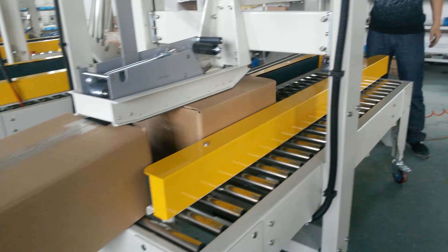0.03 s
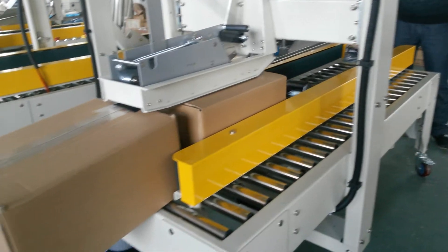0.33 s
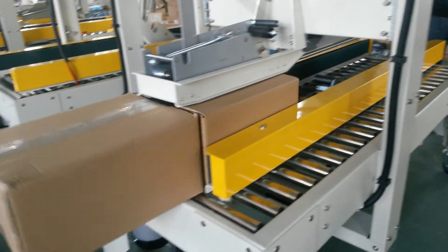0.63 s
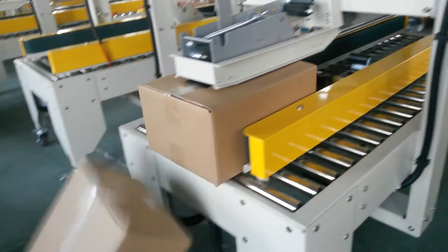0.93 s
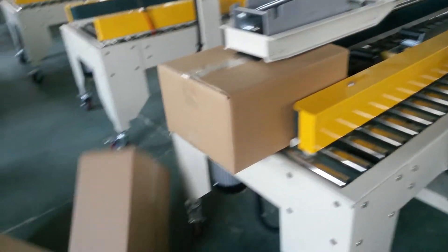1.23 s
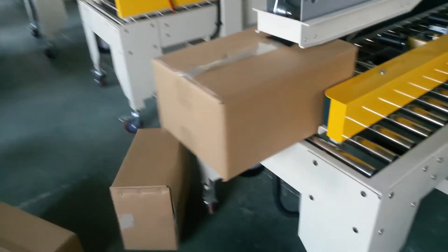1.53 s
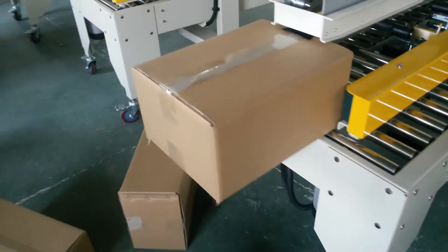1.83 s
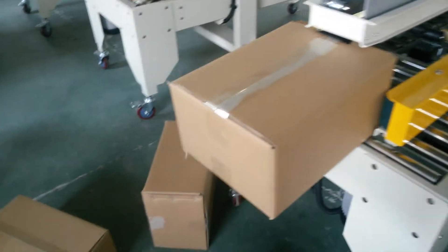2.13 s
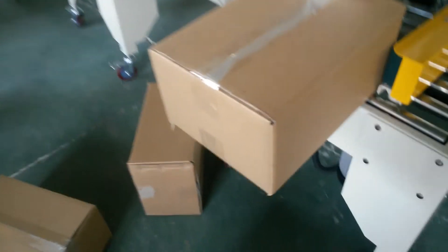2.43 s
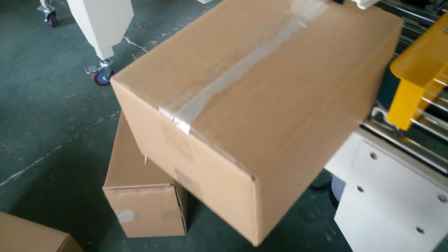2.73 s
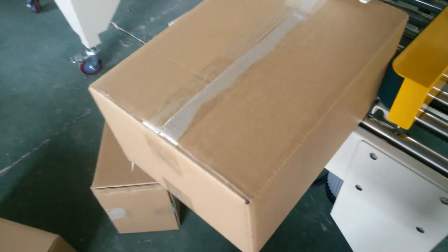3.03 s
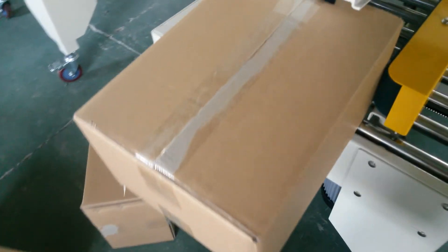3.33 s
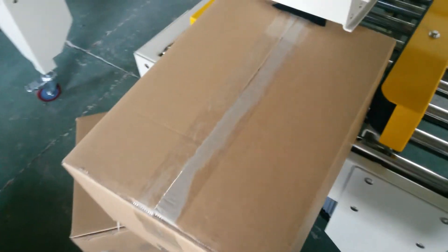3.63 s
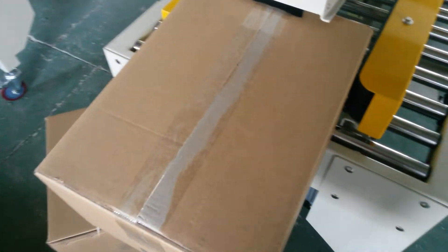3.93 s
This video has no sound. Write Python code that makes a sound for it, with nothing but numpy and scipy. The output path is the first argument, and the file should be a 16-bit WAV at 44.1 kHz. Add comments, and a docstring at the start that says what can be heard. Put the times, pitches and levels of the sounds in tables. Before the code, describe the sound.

Packing tape rasps loudly through a carton sealing machine, then hollow knocks and a motor hum.

```python
"""Carton sealer in a factory hall

Heard close to the machine, in mono. Packing tape tears off its roll in a loud, fluttering
rasp until the blade cuts it; one carton drops off the end and the tape rollers knock hollowly on the
next. The hall rings out, leaving the drive's hum and whine and the rub of the belts, and another
carton bumps into the machine."""
import sys
import numpy as np
from scipy import signal
from scipy.fft import rfft, irfft
from scipy.io import wavfile
from scipy.ndimage import uniform_filter1d

SR = 44100
rng = np.random.default_rng(int(sys.argv[2]) if len(sys.argv) > 2 else 0)


def master(y):
    """Save y as 16-bit WAV."""
    cut = np.clip(np.atleast_2d(y).T, -1, 1)
    pcm = np.round(cut * 32767)  # scale
    wavfile.write(sys.argv[1], SR, pcm.astype(np.int16))


N = 176400

# pull on the tape, ending at the cut: time_s, level_db
TAPE_PULL = [(0, -13.5), (.15, -16), (.33, -16.5), (.55, -16), (.69, -17), (.93, -18), (1.0, -18),
             (1.02, -32), (1.06, -19.5), (1.16, -20), (1.23, -21.5), (1.28, -21), (1.37, -22.5),
             (1.43, -17.5), (1.465, -19), (1.48, -51)]
# rub of the belts on the carton: time_s, level_db
BELT_LOAD = [(0, -24), (2.4, -53), (2.8, -46.5), (2.92, -44.5), (3.13, -45), (3.38, -46), (3.56, -42.5),
             (3.66, -41.5), (3.85, -43), (4, -43.5)]


def amp(db):
    """Decibels to gain."""
    return 10 ** (np.asarray(db) / 20)


def unit(x):
    """Scales to rms 1."""
    return x / np.sqrt(np.mean(x ** 2) + 1e-20)


def level(points):
    """Gain at every sample from (time_s, level_db) points."""
    return amp(np.interp(np.arange(N) / SR, *np.transpose(points)))


def read(points, hz):
    """Reads (frequency_hz, value) points on a log axis."""
    f, value = np.transpose(points)
    return np.interp(np.log(hz + 1), np.log(f), value)


def colour(x, spectrum):
    """Shapes x by (frequency_hz, gain_db) points, at rms 1."""
    gain = amp(read(spectrum, np.fft.rfftfreq(len(x), 1 / SR)))
    return unit(irfft(rfft(x) * gain, len(x)))


def below(x, hz):
    """The part of x under hz."""
    return signal.sosfiltfilt(signal.butter(3, hz, fs=SR, output="sos"), x)


def drift(rate_hz):
    """Smooth random movement of rms 1."""
    rolloff = np.exp(-(np.fft.rfftfreq(N, 1 / SR) / rate_hz) ** 2)
    return unit(irfft(rfft(rng.standard_normal(N)) * rolloff, N))


def tone(hz, waver):
    """A sine of rms 1 whose pitch wavers by the fraction waver and whose level flickers."""
    pitch_hz = hz * (1 + waver * drift(14.0))
    return unit(np.sin(2 * np.pi * np.cumsum(pitch_hz) / SR) * amp(1.7 * drift(24)))


def add(mix, start_s, sound):
    """Mixes a sound in at start_s."""
    part = mix[round(start_s * SR):][:len(sound)]
    part += sound[:len(part)]


def tape():
    """The glue lets go in thousands of tiny slips, bunched by the flutter; they ring the tape head."""
    # spectrum of the rasp: frequency_hz, gain_db
    spectrum = [(60, -32), (130, -9.5), (250, -9.5), (370, -9), (560, -7), (680, -2), (1280, -1.5),
                (1450, -6), (1800, -4), (2250, -2.5), (2900, 3), (3400, -2.5), (4700, -4.5), (7200, -4.5),
                (8500, -10.5), (10500, -19.5), (11500, -32.5)]
    # resonances of the tape head: pitch_hz, width_hz, gain_db
    head_modes = [(657, 23, -2), (756, 21, 2), (1029, 11.6, -2), (1170, 5.5, -15), (1197, 41, -3.5),
                  (1478, 16, -7), (1990, 48, -21), (2580, 15, -22), (2970, 37, -14), (3230, 25, -18),
                  (4050, 78, -23), (5100, 130, -8.5), (6330, 110, -12)]
    # swells of the rasp's low body: time_s, gain_db
    body_swell = [(0, -5), (.1, -1), (.18, 3.5), (.33, -3), (.58, 1.5), (.7, -2), (.82, -3), (.95, 3.5),
                  (1.1, 0.5), (1.3, 1), (1.45, -8.5)]
    # swells of its bright bite: time_s, gain_db
    bite_swell = [(.1, -2), (.21, 2.5), (.28, -5), (.6, -2), (.8, 0.5), (.92, 1), (1.1, -3.5), (1.45, -2)]
    slips_per_s, slip_s, spread_db, patchy_db = 3200, 0.00038, 1.5, 1.5
    flutter_hz, flutter_db, taut_s = 46.02, 2.5, 0.81
    t = np.arange(N) / SR
    sizes = (rng.random(N) < slips_per_s / SR) * amp(spread_db * np.minimum(rng.exponential(1, N), 4))
    energy = signal.lfilter([1], [1, -np.exp(-1 / (slip_s * SR))], sizes ** 2)
    slips = rng.standard_normal(N) * np.sqrt(energy)
    bands = signal.stft(slips, nperseg=256)[2]
    patches = uniform_filter1d(rng.standard_normal(bands.shape), size=7, axis=0)
    patches = unit(uniform_filter1d(patches, size=4, axis=1))  # uneven in frequency and in time
    slips = signal.istft(bands * amp(patchy_db * patches), nperseg=256)[1][:N]
    flutter = np.sin(2 * np.pi * np.cumsum(flutter_hz * (1 + 0.327 * drift(30.8))) / SR)
    tension = np.minimum(t / taut_s, 1)  # the flutter grows as the tape pulls taut
    rasp = colour(slips, spectrum) * amp(flutter_db * flutter * tension)
    ring = sum(amp(db) * signal.lfilter(*signal.iirpeak(hz, hz / width, SR), rasp)
               for hz, width, db in head_modes)
    rasp = unit(rasp + ring)
    body = below(rasp, hz=1350) - below(rasp, hz=560)
    bite = below(rasp, hz=4270) - below(rasp, hz=2300)
    rasp = rasp + body * (level(body_swell) - 1) + bite * (level(bite_swell) - 1)
    return (rasp * level(TAPE_PULL) + twangs()) * (t < TAPE_PULL[-1][0])


def twangs():
    """Larger slips pluck the taut tape in short, bright crackles; a few stand out from the patter."""
    # strongest plucks: start_s, level_db
    strongest = [(0.189, -18), (.398, -17.5), (.452, -12.5), (.483, -19), (.503, -17), (0.545, -14.5),
                 (.654, -15), (0.693, -18), (0.722, -12.5), (.847, -21), (.886, -17), (.926, -14.5)]
    # spectrum of a twang: frequency_hz, gain_db
    spectrum = [(1500, -58), (2400, -15), (3000, -1), (3950, -3.5), (4500, -15), (11000, -40)]
    plucks_per_s, rise_s = 56, 0.0021
    plucks = amp(-14.5) * rng.rayleigh(1, N) * (rng.random(N) < plucks_per_s / SR) * level(TAPE_PULL)
    for start_s, db in strongest:
        add(plucks, start_s, amp([db]))
    age = np.arange(SR // 40) / SR / rise_s
    envelope = signal.fftconvolve(plucks, age * np.exp(1 - age))[:N]
    return envelope * colour(rng.standard_normal(N), spectrum)


def drive():
    """Motors and gears: a lumpy rumble, hum and one clear whine."""
    # swell of rumble and hum: time_s, level_db
    swell = [(0, -46.5), (2.3, -54.5), (2.55, -48.5), (2.95, -42.5), (3.4, -42), (4, -43.5)]
    # spectrum of the rumble: frequency_hz, gain_db
    spectrum = [(15, -50), (30, -15), (46, 6.5), (65, 5), (90, 3.5), (170, 2.5), (240, -2.5), (330, -11),
                (460, -6.5), (800, -21), (1400, -43), (3000, -32), (8000, -27.5), (12000, -56)]
    # tones of the hum: pitch_hz, gain_db
    hum_tones = [(47, -21), (88, -6.5), (132, -23), (146, -19), (297, -9), (318, -23), (400, -16),
                 (555, -30.5), (610, -35), (1031, -20), (1663, -20), (2140, -18), (2273, -34),
                 (2374, -15.5), (2569, -16), (3155, -20.5)]
    # swell of the whine: time_s, level_db
    whine_swell = [(0, -79), (2.4, -56.5), (2.8, -64), (2.92, -58), (2.98, -50), (3.37, -45.5),
                   (3.48, -48.5), (3.68, -47.5), (3.87, -56), (3.94, -47.5)]
    whine_hz, waver, lumpy_db = 1132, 0.00087, 1.5
    rumble = colour(rng.standard_normal(N), spectrum)
    rumble += below(rumble, hz=400) * (amp(lumpy_db * drift(25)) - 1)
    hum = sum(amp(db) * tone(hz, waver) for hz, db in hum_tones)
    return (rumble + hum) * level(swell) + tone(whine_hz, waver) * level(whine_swell)


def belts():
    """The side belts rub along the cardboard with a fine, uneven grain."""
    # spectrum of the rub: frequency_hz, gain_db
    spectrum = [(300, -7.5), (800, 4), (1450, 0), (2100, 6.5), (2400, 2), (2900, 2.5), (3700, -8.5),
                (4500, -4.5), (5200, -8.5), (5800, -9), (6800, -12), (7900, -27), (9000, -39), (12000, -29)]
    grain = rng.standard_normal(N) * amp(0.95 * drift(130))
    return colour(grain, spectrum) * level(BELT_LOAD)


def rollers():
    """Dry roller bearings whistle faintly as the belts take the load, and squeak now and then."""
    # thin whistles: pitch_hz, level_against_belts_db
    whistles = [(4420, -21), (5640, -19.5), (6200, -25)]
    # squeaks of a roller: start_s, length_s, pitch_hz, level_db
    squeaks = [(3.703, 0.032, 7200, -46), (3.93, 0.088, 7827, -52)]
    waver = 0.0083
    out = sum(amp(db) * tone(hz, waver) for hz, db in whistles) * level(BELT_LOAD)
    for start_s, length_s, hz, db in squeaks:
        swell = signal.windows.tukey(round(length_s * SR))
        add(out, start_s, amp(db) * swell * tone(hz, waver)[:len(swell)])
    return out


def thumps():
    """Each blow rings two modes of a cardboard panel and the air in the box, with a dry slap on top."""
    # hollow blows, the last three columns relative to the panel's lower mode:
    # start_s, level_db, panel_hz, t60_s, cavity_db, slap_db, upper_mode_db
    blows = [(.687, -16, 251, 0.067, -1.5, -23, -20), (0.79, -23.5, 195, 0.089, 5.5, -20, -15),
             (1.022, 8, 276, 0.03, -2.5, -20.5, -19), (1.055, -7, 245, 0.074, -20, -23, -19),
             (1.078, -20.5, 235, .06, -10, -8, 14), (1.13, -12, 223, 0.082, -15, -13, -2),
             (1.273, -9.5, 257.8, 0.16, -9.5, -6, -12), (1.443, -12, 214, 0.086, -9, -5, -12),
             (1.492, -3.5, 233, 0.1, -12.5, -9, -1.5), (1.53, -13, 248, 0.08, -9, -16, -14),
             (1.553, -7.5, 236, 0.083, -11, -16.5, -16), (1.618, -3, 228.4, 0.088, -22, -17.5, -10),
             (1.664, -6, 242, 0.053, -5, -20.5, -4), (1.737, -29, 253, 0.051, -13, 7, -6),
             (1.747, -17.5, 254.4, .085, 5, -1.5, -2), (1.762, -20, 246, 0.2, 0.5, -4, -14),
             (1.787, -31, 255, 0.1, -3, -16, -2), (1.93, -36, 237, 0.088, -18, -1, 8),
             (1.993, -39.5, 233, 0.14, 14, 0, -6), (2.61, -46, 201, .11, 5, 9, 3),
             (2.95, -43, 217, .078, -9, 8.5, -6), (3.192, -17, 309, 0.054, -3, -9.5, -31),
             (3.218, -26.5, 240, 0.088, -8, -2, -15), (3.262, -31, 236, 0.078, 3, -11, -15)]
    # spectrum of the slap: frequency_hz, gain_db
    slap_spectrum = [(100, -1.5), (350, -2.5), (480, -5), (600, -4.5), (800, -9), (1100, -14), (2500, -21),
                     (6000, -24), (12000, -45)]
    cavity_hz, low_cut_hz = 135.6, 104
    push_s, upper_t60_s, slap_t60_s = 0.007, 0.033, 0.091
    out, t = np.zeros(N), np.arange(SR // 2) / SR
    for start_s, db, panel_hz, t60, cavity_db, slap_db, upper_db in blows:
        panel = np.sin(2 * np.pi * panel_hz * t) * amp(-60 * t / t60)
        upper_hz = 783 * (1 + .08 * rng.standard_normal())
        upper = np.sin(2 * np.pi * upper_hz * t) * amp(upper_db - 60 * t / upper_t60_s)
        cavity = np.sin(2 * np.pi * cavity_hz * t) * amp(cavity_db - 60 * t / (1.36 * t60))
        slap = colour(rng.standard_normal(len(t)), slap_spectrum) * amp(slap_db - 60 * t / slap_t60_s)
        add(out, start_s, amp(db) * np.minimum(t / push_s, 1) * (panel + upper + cavity + slap))
    return signal.sosfilt(signal.butter(2, low_cut_hz, "high", fs=SR, output="sos"), out)


def snaps():
    """Short bursts of crackle as tape stretches and is cut, and as roller arms strike and scrape."""
    # snaps of tape, arms and blade: start_s, level_db, rise_s, t60_s, centre_hz, width_octaves
    bursts = [(0.915, -24, 0.036, 0.3, 970, 0.18), (1.427, -24, 0.0026, 0.03, 3880, 1.1),
              (1.449, -15, 0.0035, 0.04, 3980, 0.55), (1.493, -8, 0.00017, 0.012, 2200, 1),
              (1.548, -11, 0.003, 0.049, 4270, 0.68), (1.549, -21.5, 0.001, 0.015, 8000, 0.53),
              (3.18, -37, 0.0025, 0.067, 6650, 0.25), (3.198, -35.5, 0.0016, 0.11, 6750, 0.33),
              (3.214, -37, 0.0025, 0.36, 6900, 0.41), (3.272, -36, 0.0017, 0.051, 6700, .18),
              (3.207, -35.5, 0.0092, 0.26, 460, 0.43), (3.206, -36.5, 0.005, 0.22, 2680, 0.6),
              (3.232, -36, 0.0066, 0.3, 1410, 0.98), (3.703, -36.5, 0.018, 0.51, 2630, 0.21),
              (3.709, -41.5, 0.0033, 0.85, 5950, 0.58)]
    top_hz = 8000
    out, t = np.zeros(N), np.arange(SR // 2) / SR
    f = np.fft.rfftfreq(len(t), 1 / SR) + 1
    for start_s, db, rise, t60, hz, octaves in bursts:
        band = np.exp(-.5 * (np.log2(f / hz) / octaves) ** 2) / np.sqrt(1 + (f / top_hz) ** 12)
        burst = unit(irfft(rfft(rng.standard_normal(len(t))) * band, len(t)))
        envelope = np.minimum(t / rise, 1) * amp(db - 60 * np.maximum(t - rise, 0) / t60)
        add(out, start_s, burst * envelope)
    return out


def slide():
    """The carton's underside hisses as it is pushed out over the rollers."""
    # swell of the hiss: time_s, level_db
    swell = [(2.7, -85), (2.81, -68), (2.87, -57), (2.97, -54), (3.08, -62), (3.42, -72), (3.54, -57),
             (3.63, -69)]
    # spectrum of the hiss: frequency_hz, gain_db
    spectrum = [(2500, -27), (3700, -12), (4150, 6), (4900, -13), (5400, -4), (5680, 9), (5950, 2),
                (6250, -5), (6900, -14), (9000, -42)]
    grain = rng.standard_normal(N) * amp(2.9 * drift(90))
    return colour(grain, spectrum) * level(swell)


def hall(x, wet_db):
    """Direct sound, quick reflections off the machine frame, and the hall's long tail."""
    # ring of the hall: frequency_hz, t60_s
    decay = [(100, 2.15), (250, 0.57), (800, 1.94), (3000, 1.55), (5000, 1.31), (8000, 1.36), (12000, 0.59)]
    build_s, early_db, early_t60_s, crossfade_hz = 0.037, -11, 0.16, 1.321
    out, t = x, np.arange(SR // 4) / SR
    for k in range(3):  # three crossfading sets of paths keep the hall's ring smooth and even
        hz, age_s, bands = signal.stft(rng.standard_normal(2 * SR), SR, nperseg=256)
        fade = amp(-60 * age_s / read(decay, hz)[:, None])
        tail = signal.istft(bands * fade * np.minimum(age_s / build_s, 1), SR, nperseg=256)[1]
        early = rng.standard_normal(len(t)) * (rng.random(len(t)) < .05)
        early *= (t > .004) * amp(-60 * t / early_t60_s)
        paths = amp(wet_db) * tail / np.linalg.norm(tail)
        add(paths, 0, amp(early_db) * early / np.linalg.norm(early))
        share = np.sqrt(2 / 3) * np.cos(np.pi * (crossfade_hz * np.arange(N) / SR + k / 3))
        out = out + signal.fftconvolve(x * share, paths)[:N]
    return out


def scene():
    """Machine and hall at the microphone, alike in both channels."""
    mono = hall(tape(), wet_db=-6.5) + hall(thumps(), wet_db=-9)
    mono += hall(snaps() + rollers(), wet_db=-11.5)
    mono += drive() + belts() + slide()
    return np.array([mono, mono])


def record(dry):
    """The recorder rounds off the highest peaks and limits the band."""
    ceiling, knee, edge_hz = .9, 8, 11200
    rounded = dry / (1 + abs(dry / ceiling) ** knee) ** (1 / knee)
    lowpass = signal.firwin(255, edge_hz, window=("kaiser", 8), fs=SR)
    return signal.oaconvolve(rounded, lowpass[None], "same")


dry = scene()
out = record(dry)
master(out)
```